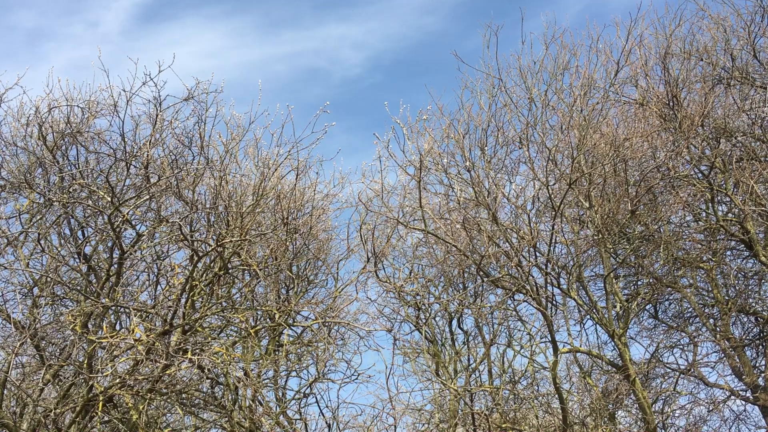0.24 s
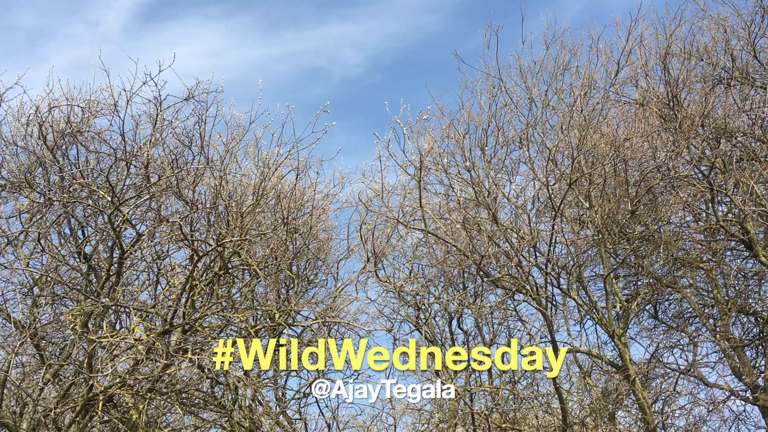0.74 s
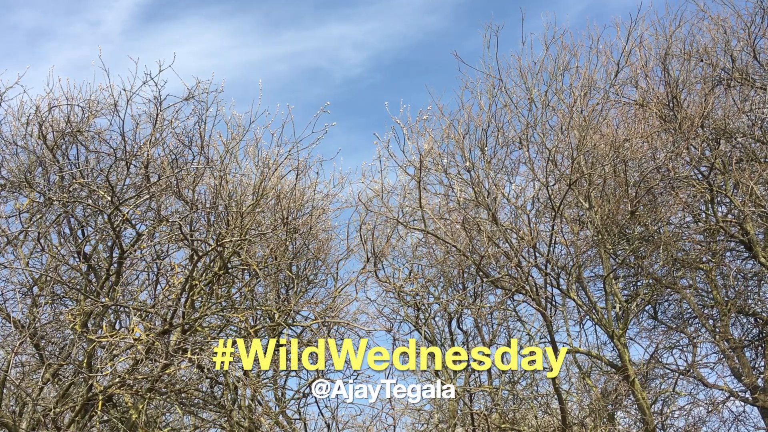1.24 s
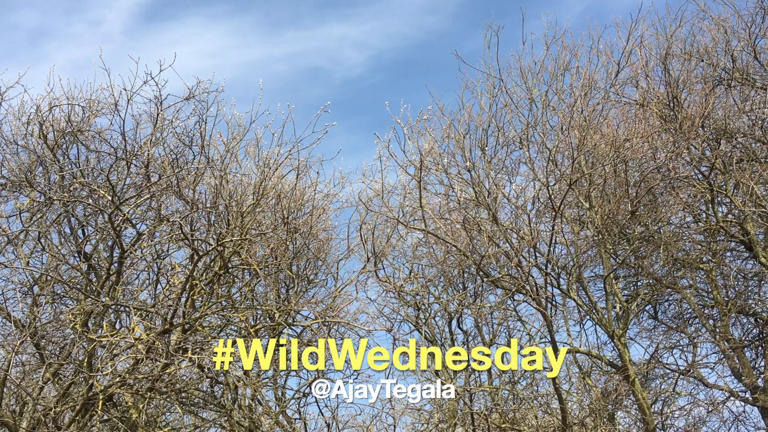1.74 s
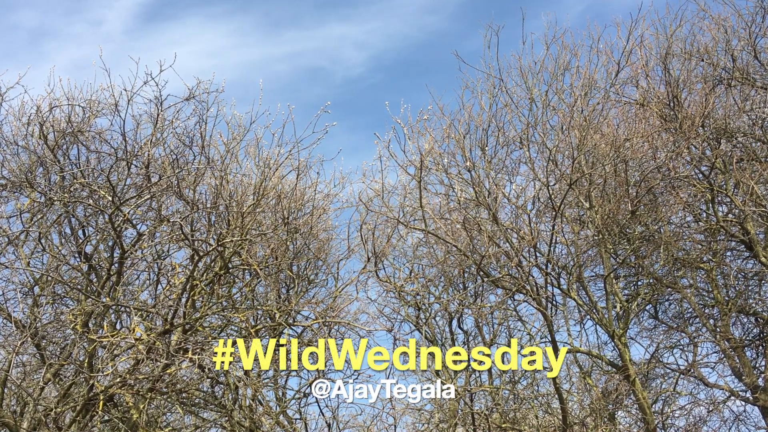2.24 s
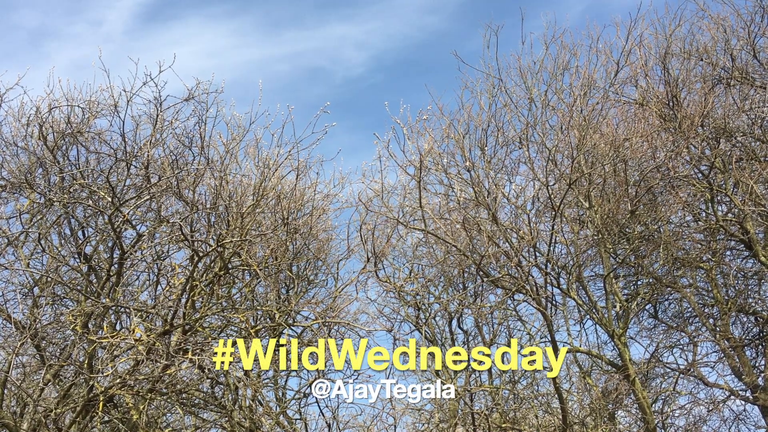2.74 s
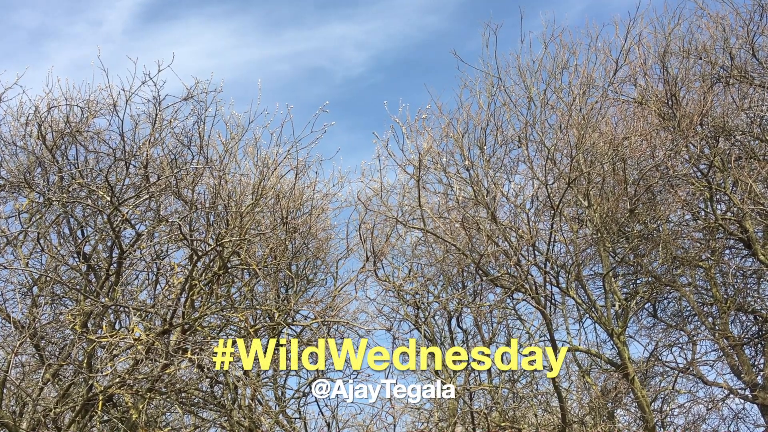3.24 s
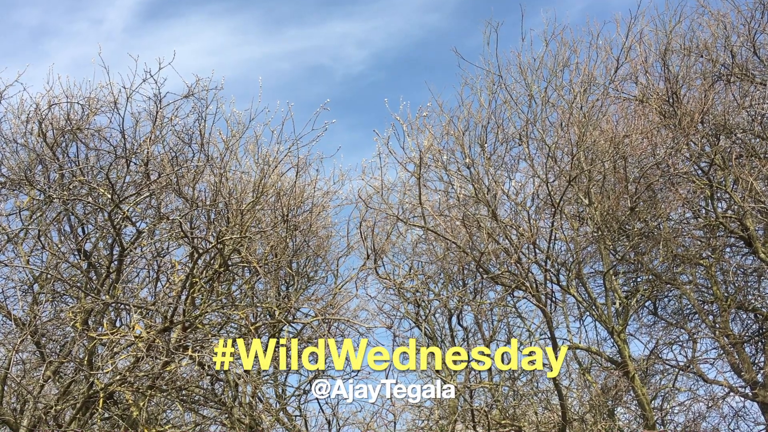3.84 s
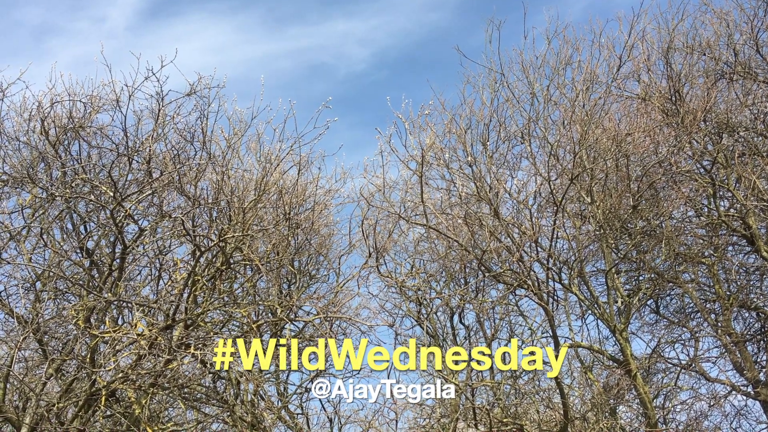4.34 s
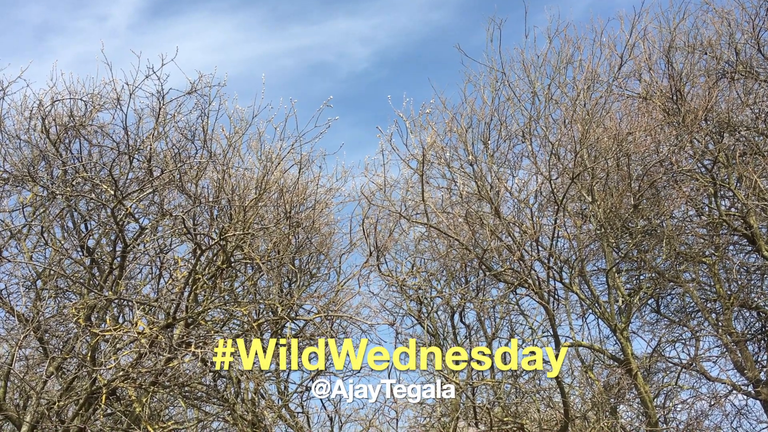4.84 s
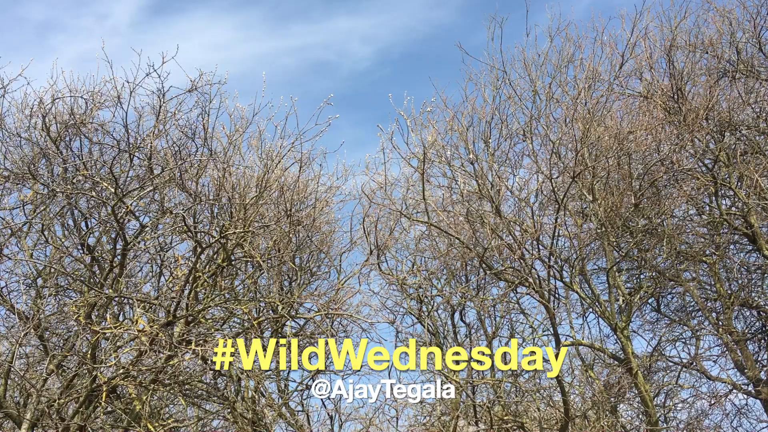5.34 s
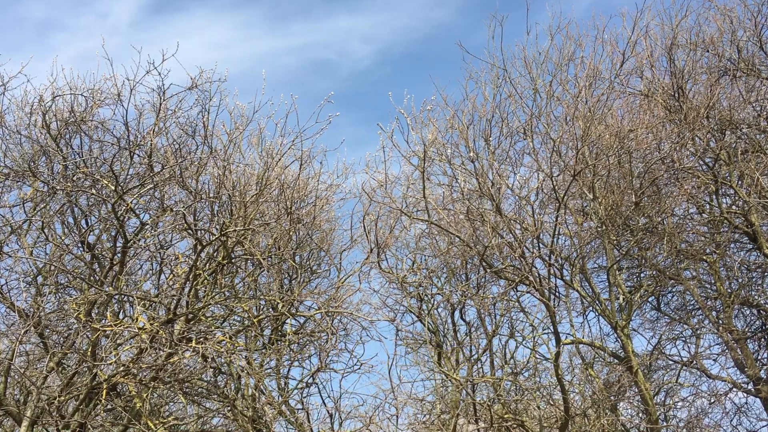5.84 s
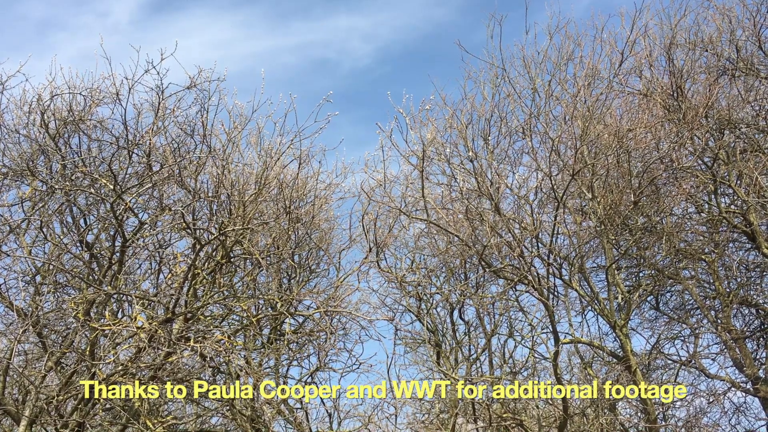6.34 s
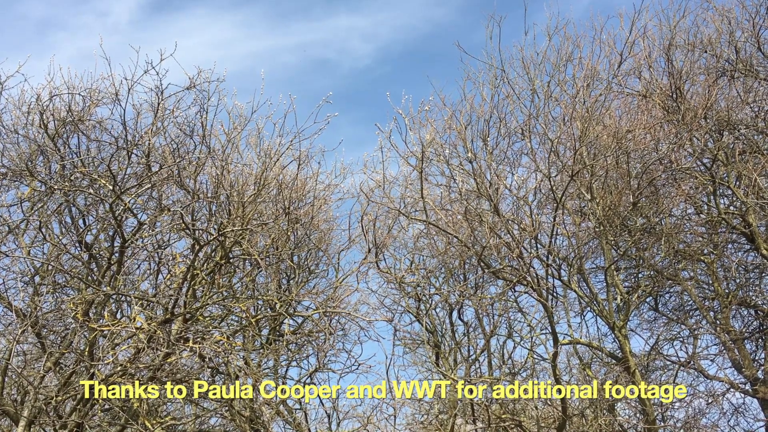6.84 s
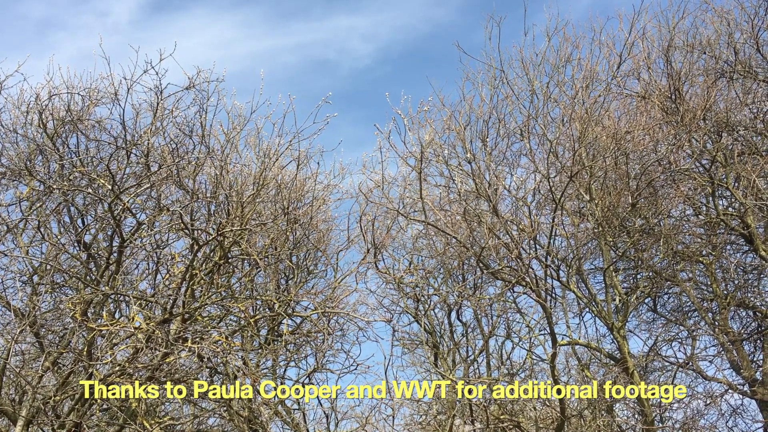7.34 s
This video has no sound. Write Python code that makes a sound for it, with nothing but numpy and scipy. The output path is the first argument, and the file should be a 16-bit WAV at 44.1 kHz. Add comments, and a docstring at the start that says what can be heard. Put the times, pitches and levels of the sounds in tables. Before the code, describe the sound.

In open woodland, small birds sing bright, quick phrases close by while others whistle thinly farther off. Twice, a few seconds apart, a woodpecker hammers out a rapid, hollow roll that rings among the trees and fades. Between the rolls comes a faint, hoarse call from a large bird. A soft low rumble continues throughout, with a few gentle puffs of wind on the microphone late on.

```python
"""Bare woodland: a woodpecker drums two quickening rolls on a hollow limb; songbirds sing near and far.
Each bill strike is a click plus the limb's ringing modes; each songbird note is a gliding, near-pure tone.
A large bird calls once in the distance, twigs tick, and branches and trunks scatter the calls and strikes.
Under it lie a low far rumble and the hush of the air, and a breeze bumps the microphone."""
import sys
import numpy as np
from scipy import signal
from scipy.fft import rfft, irfft, next_fast_len
from scipy.io import wavfile
from scipy.ndimage import map_coordinates

SR = 44100
rng = np.random.default_rng(int(sys.argv[2]) if len(sys.argv) > 2 else 0)


def dump_mix(stems):
    """Bounce the given channels to the path in sys.argv[1] as a 16-bit WAV at rate SR."""
    frames = np.atleast_2d(stems).T  # one column per channel
    limited = np.clip(frames, -1, 1)  # hard clip at full scale
    pcm = np.round(limited * 32767).astype(np.int16)
    wavfile.write(sys.argv[1], SR, pcm)


N = 334719
CLOSE_OVERTONE_DB = -43


def woodpecker():
    """Each strike is a click that sweeps down; the limb rings on and its hollow note fills the wood."""
    # Limb modes. Each row: frequency in Hz, relative level in dB, t60 in seconds.
    limb_modes = [(684, -9.5, 0.035), (980, -30, .025), (1115, -0.5, 0.024), (1239, -4.5, 0.064),
                  (1296, 0.5, 0.029), (1840, -18, 0.011), (2180, -21, 0.014)]
    # The trunk's response to the click. Each row: frequency in Hz, gain in dB.
    click_colour = [(500, -7), (750, 2.5), (1200, 1), (1550, -10), (1900, 0.5), (2200, -2), (2350, -6),
                    (2650, -7.5), (3500, 3.5)]
    clicks, rings = np.zeros(N), np.zeros(N)
    t = np.arange(SR // 8) / SR
    phase, envelope = glide(0.0034, [3300, 1750, 600], waver=0, waver_hz=100, taper=0.73)
    click = envelope * np.sin(phase)
    for start_s, db in strikes():
        ring = np.zeros(len(t))
        for hz, mode_db, t60_s in limb_modes:
            decay = amp(mode_db + rng.normal(0, 1) - 60 * t / t60_s)
            ring += decay * np.sin(2 * np.pi * (hz * t + rng.random()))
        ring *= 1 - np.exp(-t / 0.0015)
        heard_click = woods(click, early_db=-6, early_t60_s=0.1, late_db=-8, build_s=0.023)
        heard_ring = woods(ring, early_db=3.5, early_t60_s=0.086, late_db=1, build_s=0.12)
        add(clicks, start_s, amp(db + 7.5) * heard_click)
        add(rings, start_s + 0.002043, amp(db + 2) * heard_ring)
    return filtered(clicks, lambda hz: amp(along(click_colour, hz))) + rings


def strikes():
    """Time and level of each bill strike: a roll starts softly, hesitates, quickens and tires."""
    # Drum rolls. Each row: start in seconds, strike count, relative level in dB.
    rolls = [(2.6539, 17, -49), (6.2576, 16, -49)]
    gap_s, quicken_s, hesitate_s = 0.0578, 0.00135, 0.0065
    first_tap_db, tiring_db = -8, -8.5
    for start_s, count, db in rolls:
        k = np.arange(count)
        gaps_s = gap_s - quicken_s * k + hesitate_s * 0.3 ** k
        levels_db = db + first_tap_db * (k == 0) + tiring_db * (k / k[-1]) ** 3.2
        yield from zip(start_s + np.cumsum(gaps_s) - gaps_s, levels_db)


def near_birds():
    """Loud pure slurs from the closest trees: one song sung twice, and a lower see-saw figure."""
    # The song. Each row: offset and length in seconds, pitch in Hz, relative level in dB, syllable.
    song = [(0, .042, 4460, -47, "curl"), (0.073, 0.014, 4310, -49, "lift"),
            (0.106, .015, 4226, -48.5, "level"), (0.115, .028, 3980, -46, "dip"),
            (0.133, .024, 5087, -52, "arch"), (0.182, .012, 4560, -47, "level"),
            (.224, 0.018, 4250, -50.5, "level"), (0.264, 0.019, 4595, -50, "sag"),
            (0.299, 0.029, 4150, -53, "sag"), (0.343, 0.026, 4627, -50, "sag"),
            (0.444, .021, 4424, -45, "dip"), (0.568, 0.024, 5030, -50, "rise"),
            (0.663, 0.018, 4140, -48.5, "rise"), (0.962, .082, 6000, -46.5, "swoop"),
            (1.075, .024, 4600, -54.5, "flick"), (1.096, 0.059, 5600, -52, "sag"),
            (1.179, .024, 4770, -55, "flick"), (1.214, .028, 4940, -54.5, "fall"),
            (1.266, 0.031, 4530, -61.5, "flick"), (1.398, .019, 4600, -59, "flick"),
            (1.42, .019, 5710, -54, "fall")]
    # Its entries. Each row: start in seconds, gain in dB.
    song_starts = [(0.586, 0), (4.19, 0)]
    # See-saw figure. Each row: offset and length in seconds before stretch, semitones, accent in dB, syllable.
    seesaw = [(0, .033, 0, 0.5, "rise"), (.055, .023, 0.97, -2.5, "dive")]
    # Its entries. Each row: start in seconds, time stretch, pitch in Hz, relative level in dB.
    seesaw_calls = [(1.689, 0.88, 3750, -52), (1.814, 1.05, 3740, -52), (1.937, 1.25, 3660, -54.5),
                    (2.092, .85, 3210, -62)]
    songs = [(start_s + offset_s, length_s, hz, db + gain_db, shape)
             for start_s, gain_db in song_starts for offset_s, length_s, hz, db, shape in song]
    return sing(songs + repeats(seesaw, seesaw_calls), gain_db=2,
                voice=dict(overtone_db=CLOSE_OVERTONE_DB, waver=0.0099, taper=0.22, rasp_db=-31.5),
                echo=dict(early_db=-2, early_t60_s=0.18, late_db=-8.5, build_s=0.02))


def clear_close_notes():
    """Clear notes so close that they leave little echo, among them the closing notes of each pass of the near
    song."""
    # Each row: start and length in seconds, pitch in Hz, relative level in dB, syllable.
    clear_notes = [(1.183, 0.035, 3550, -45, "crest"), (1.219, .037, 3500, -51, "sag"),
                   (1.559, 0.048, 3930, -50.5, "hook"), (1.782, 0.028, 6030, -55.5, "lift"),
                   (4.773, 0.0323, 3386, -40, "lift"), (4.798, 0.041, 3460, -43.5, "level"),
                   (4.831, 0.11, 3432, -48, "level")]
    return sing(clear_notes, gain_db=3,
                voice=dict(overtone_db=CLOSE_OVERTONE_DB, waver=0.008, taper=0.22, rasp_db=-33),
                echo=dict(early_db=-3.5, early_t60_s=0.17, late_db=-15.5, build_s=0.02))


def shrill_bird():
    """A close, shrill voice with a faint octave: sweeps, then held notes and drops in turn."""
    # Each row: start and length in seconds, pitch in Hz, relative level in dB, syllable.
    phrase = [(5.063, 0.078, 9100, -61.5, "peak"), (5.075, .04, 7750, -57.5, "crest"),
              (5.175, .038, 8740, -62, "crest"), (5.184, 0.026, 7450, -51, "crest"),
              (5.243, .075, 5900, -45.5, "plunge"), (5.366, 0.05, 6950, -47.5, "level"),
              (5.461, 0.066, 6270, -44.5, "drop"), (5.562, 0.074, 7070, -47.5, "level"),
              (5.701, 0.063, 6550, -45.5, "drop"), (5.805, 0.11, 7260, -52, "level")]
    return sing(phrase, gain_db=2,
                voice=dict(overtone_db=-30.5, waver=0.0066, taper=0.2, rasp_db=-43),
                echo=dict(early_db=-4, early_t60_s=0.17, late_db=-9.5, build_s=0.029))


def warbler():
    """A close, hoarse voice with side tones and a fluttering pitch."""
    # Each row: start and length in seconds, pitch in Hz, relative level in dB, syllable.
    warble_notes = [(5.995, 0.02, 4120, -55, "arch"), (5.999, 0.056, 3374, -44, "arch"),
                    (6.054, 0.013, 3780, -51.5, "fall"), (6.084, 0.01, 3460, -46, "hook"),
                    (6.111, 0.015, 3650, -44, "hook"), (6.141, 0.015, 3394, -45, "hook"),
                    (6.142, 0.04, 2430, -61.5, "dip"), (6.296, 0.049, 2776, -54, "lift"),
                    (6.363, 0.06, 2700, -58, "sag"), (6.447, .08, 2673, -63, "level"),
                    (6.641, 0.015, 3860, -45, "dive"), (6.667, 0.021, 2725, -54, "fall"),
                    (6.724, 0.0081, 2540, -49, "hook"), (6.784, .018, 4700, -44.5, "dip"),
                    (6.797, 0.018, 5230, -49.5, "rise"), (6.817, 0.044, 4590, -45, "fall"),
                    (6.885, .018, 4280, -46, "flick"), (6.89, 0.019, 5470, -53, "level"),
                    (7.004, 0.0215, 3280, -43.5, "fall"), (7.088, 0.12, 3143, -47, "swing"),
                    (7.263, 0.021, 4130, -47, "dive"), (7.269, 0.018, 4000, -51, "level"),
                    (7.331, 0.018, 2440, -55, "dive"), (7.365, 0.04, 2287, -55.5, "rise"),
                    (7.454, 0.012, 3920, -42, "arch"), (7.466, 0.0207, 4600, -46.5, "rise"),
                    (7.525, 0.016, 4230, -51, "sag"), (7.526, 0.021, 5630, -50, "dip")]
    return sing(warble_notes, gain_db=3,
                voice=dict(overtone_db=CLOSE_OVERTONE_DB, waver=0.0277, taper=0.21, rasp_db=-16),
                echo=dict(early_db=-1, early_t60_s=0.1, late_db=-13.5, build_s=0.02))


def high_birds():
    """Long thin whistles from the treetops."""
    # Each row: start and length in seconds, pitch in Hz, relative level in dB, syllable.
    thin_notes = [(0.268, 0.14, 6460, -59, "sag"), (0.44, 0.093, 8430, -52, "level"),
                  (2.73, .14, 7540, -72, "level"), (3.393, 0.13, 8490, -63, "sag"),
                  (3.562, 0.07, 8330, -61, "sag"), (3.697, 0.028, 8480, -54, "level"),
                  (3.786, 0.034, 8550, -51, "level"), (3.834, 0.14, 7910, -56.5, "sag"),
                  (3.842, 0.16, 8460, -50.5, "level"), (4.012, 0.12, 8450, -51, "level"),
                  (4.248, .099, 6700, -71.5, "level"), (7.283, 0.16, 7530, -65.5, "sag")]
    return sing(thin_notes, gain_db=-2.5,
                voice=dict(overtone_db=-56, waver=0.0059, taper=0.1, rasp_db=-55),
                echo=dict(early_db=-3, early_t60_s=0.18, late_db=-8, build_s=0.062))


def trills():
    """A pitch shaken very fast spreads each note into a thin buzz."""
    # Each row: start and length in seconds, first, middle and last pitch in Hz, relative level in dB.
    buzzes = [(0.562, .12, 7440, 7000, 6800, -72), (1.817, 0.22, 7700, 6950, 6940, -68),
              (2.853, .23, 7030, 6790, 6550, -71.5), (4.382, 0.094, 7100, 6930, 6930, -74)]
    out = np.zeros(N)
    for start_s, length_s, *pitches_hz, db in buzzes:
        note = whistle(length_s, pitches_hz, overtone_db=-46, waver=0.028, taper=0.34, rasp_db=-37)
        heard = woods(note, early_db=-8.5, early_t60_s=0.14, late_db=-3, build_s=0.03)
        add(out, start_s, amp(db) * heard)
    return out


def far_birds():
    """Distant repeated calls and stray notes, each trailing a soft echo."""
    # Runs of one falling slur. Each row: start in seconds, relative level in dB.
    slur_runs = [(0.613, -66), (2.24, -73)]
    # Slurs in each run.
    slur_counts = [5, 3]
    # Calls that fall, hold and fall. Each row: start in seconds, held pitch in Hz, relative level in dB.
    stair_calls = [(2.671, 4630, -64), (2.883, 4030, -64.5), (3.042, 4570, -62.5), (5.809, 4070, -65),
                   (6.157, 4660, -63), (6.277, 4610, -64), (6.648, 4530, -66)]
    # Two-note figure. Each row: offset and length in seconds before stretch, semitones,
    # accent in dB, syllable.
    two_note = [(0, .042, 8, -2, "fall"), (.058, 0.0585, 0, 0.5, "dip")]
    # Its entries. Each row: start in seconds, time stretch, pitch in Hz, relative level in dB.
    two_note_calls = [(2.275, 0.97, 3570, -65), (2.508, 0.95, 3725, -69.5), (5.883, 0.96, 3590, -64.5),
                      (6.521, 0.98, 3600, -63.5)]
    # Stray notes. Each row: start and length in seconds, pitch in Hz, relative level in dB, syllable.
    strays = [(0.048, 0.25, 3646, -74, "level"), (0.139, 0.026, 4620, -67.5, "rise"),
              (0.213, 0.039, 4410, -64.5, "lift"), (0.222, 0.034, 2170, -67, "hook"),
              (0.33, 0.02, 5000, -71, "dive"), (0.45, .035, 5150, -74, "rise"),
              (0.465, .057, 4730, -64, "level"), (0.527, .045, 3150, -77, "fall"),
              (0.54, 0.021, 7100, -69, "rise"), (0.671, .064, 7750, -65.5, "sag"),
              (0.808, .061, 7960, -67, "sag"), (1.248, 0.055, 7720, -73, "sag"),
              (1.422, .026, 2150, -70, "fall"), (1.44, .027, 5750, -64, "lift"),
              (2.25, 0.037, 2430, -70, "dive"), (4.109, 0.075, 3350, -73, "dive"),
              (5.862, 0.029, 1646, -68.5, "dive"), (6.266, 0.033, 2140, -59, "dip"),
              (6.911, .052, 6320, -68, "rise"), (6.98, .15, 8250, -78.5, "sag"),
              (7.088, 0.18, 4440, -64.5, "arch"), (7.188, 0.094, 5500, -64.5, "rise"),
              (7.445, 0.092, 5710, -61.5, "dip")]
    slur_s, slur_period_s, slur_hz, stair_s = 0.066, 0.175, 5880, 0.09
    slurs = [(start_s + k * slur_period_s, slur_s, slur_hz, db, "fall")
             for (start_s, db), count in zip(slur_runs, slur_counts) for k in range(count)]
    stairs = [(start_s, stair_s, hz, db, "stair") for start_s, hz, db in stair_calls]
    return sing(slurs + stairs + repeats(two_note, two_note_calls) + strays, gain_db=1.5,
                voice=dict(overtone_db=-41, waver=0.0073, taper=0.2, rasp_db=-52),
                echo=dict(early_db=-6, early_t60_s=0.36, late_db=-21.5, build_s=0.024))


def large_bird():
    """A hoarse harmonic call from far away, wrapped in echo."""
    # Each row: start and length in seconds, first, middle and last pitch in Hz, relative level in dB.
    honks = [(3.525, 0.045, 575, 673, 650, -54), (3.592, 0.033, 970, 1040, 935, -56),
             (3.607, 0.147, 698, 722, 714, -53)]
    # Throat response. Each row: frequency in Hz, gain in dB.
    throat = [(700, -6), (1050, 5), (1450, -8), (2150, -0.5), (2900, -25), (3600, -0.5), (4300, -10.5),
              (5200, -19), (7000, -25)]
    out = np.zeros(N)
    for start_s, length_s, *pitches_hz, db in honks:
        phase, envelope = glide(length_s, pitches_hz, waver=0.0144, waver_hz=293, taper=0.2)
        call = envelope * sum(amp(along(throat, k * pitches_hz[1])) * np.sin(k * phase)
                              for k in range(1, 10))
        call *= 1 + 0.43 * wobble(1200, len(call))  # uneven cycles make it hoarse
        heard = woods(call, early_db=-4.5, early_t60_s=0.4, late_db=-2.5, build_s=0.02)
        add(out, start_s, amp(db - 5.5) * heard)
    return out


def chorus(count=260, centre_hz=4907):
    """Many faint slurs from all through the wood, blurred together by their echoes."""
    # Chorus swell. Each row: time in seconds, relative level in dB.
    levels = [(0, -87), (.5, -75), (.65, -62.5), (1.1, -55), (2, -56.5), (3.4, -75.5), (4.3, -81),
              (4.9, -69), (5.4, -58.5), (5.9, -76), (6.5, -78), (6.9, -62), (7.59, -78)]
    out = np.zeros(N)
    for start_s in (np.arange(count) + rng.random(count)) * N / SR / count - 0.1:
        pitches_hz = centre_hz * np.exp(rng.uniform(-0.3, 0.3) + rng.normal(0, 0.07, size=3))
        length_s = rng.uniform(0.0242, 0.07)
        note = whistle(length_s, pitches_hz, overtone_db=-27, waver=0.0099, taper=0.93, rasp_db=-37)
        add(out, start_s, note)
    blurred = woods(out, early_db=4.5, early_t60_s=0.055, late_db=8, build_s=0.018)[:N]
    level_db = np.interp(np.arange(N) / SR, *np.transpose(levels)) - 5
    return amp(level_db) * unit(blurred)


def twigs(t60_s=0.009):
    """Tiny dry cracks in the branches."""
    # Each row: start in seconds, level in dB.
    cracks = [(4.255, -63), (4.437, -50)]
    out = np.zeros(N)
    t = np.arange(SR // 50) / SR
    for start_s, db in cracks:
        add(out, start_s, amp(db - 60 * t / t60_s) * rng.standard_normal(len(t)))
    return out


def background():
    """Far rumble that swells and sinks, the hush of the air, and soft puffs on the microphone."""
    # Rumble swell. Each row: time in seconds, relative level in dB.
    rumble_levels = [(0, -55.5), (.22, -49.5), (.35, -63), (.6, -50.5), (.95, -56), (1.3, -58.5),
                     (2.1, -56.5), (2.9, -59), (3.9, -61), (4.55, -56.5), (5.1, -56.5), (5.7, -56.5),
                     (6.3, -58), (7.59, -56.5)]
    # Breeze puffs. Each row: centre and width in seconds, level in dB.
    puffs = [(6.349, 0.016, -41), (6.75, 0.043, -50.5), (6.84, 0.034, -47), (7.08, 0.12, -54)]
    # Noise spectra. Each row: frequency in Hz, relative density in dB.
    rumble_colour = [(15, -47), (28, -31), (40, 0), (52, 4), (80, -4), (120, -12), (200, -29), (500, -64)]
    air_colour = [(60, 2.5), (200, 0), (400, 1), (750, -5.5), (1100, -5.5), (1600, -13.5), (2600, -16.5),
                  (4200, -15.5), (7000, -23.5), (10500, -26.5), (14000, -26.5), (15700, -31)]
    puff_colour = [(20, -12), (50, 7), (130, -2.5), (210, -8.5), (300, -41), (900, -53)]
    t = np.arange(N) / SR
    rumble_db = np.interp(t, *np.transpose(rumble_levels)) - 1 + 1.5 * wobble(7, N)
    rumble = amp(rumble_db) * noise(rumble_colour)
    air = amp(-64 + 0.13 * wobble(3.02, N)) * noise(air_colour)
    breeze = sum(amp(db) * np.exp(-0.5 * ((t - at_s) / width_s) ** 2) for at_s, width_s, db in puffs)
    return rumble + air + breeze * noise(puff_colour)


def sing(notes, gain_db, voice, echo):
    """A track of notes whistled in one voice and scattered by the wood."""
    out = np.zeros(N)
    for start_s, length_s, hz, db, shape in notes:
        note = whistle(length_s, syllable(shape, hz), **voice)
        add(out, start_s, amp(db + gain_db) * woods(note, **echo))
    return out


def repeats(figure, calls):
    """The notes of a short figure at each call's time, pace, pitch and level."""
    return [(start_s + stretch * offset_s, stretch * length_s, hz * 2 ** (step / 12), db + accent, shape)
            for start_s, stretch, hz, db in calls for offset_s, length_s, step, accent, shape in figure]


def syllable(shape, hz):
    """Pitches in Hz of a named syllable sung at hz."""
    # Pitch contours. Each entry: name, semitones about the pitch at even steps through the note.
    contours = {"level": [-0.081, .05, -0.022], "sag": [.6, 0, -0.31], "dip": [.8, 0, 0.34], "arch": [-1.33,
                0, -.9], "lift": [-0.8, 0, 0.52], "rise": [-1.58, 0, 1.65], "flick": [-3.5, 0, 3.7], "hook":
                [-0.58, 0, -2.8], "fall": [1.93, 0, -1.87], "dive": [4.21, 0, -3.5], "curl": [-2, 0, -0.2,
                -2.6, 0], "crest": [-1.63, 0, 0], "peak": [-5, 0, -7], "swoop": [-7, 2, 1.6, 0.2, -0.06,
                -1.2, -3], "drop": [0.54, 1.7, 0.5, 0, 0.047], "plunge": [0, 4, 4, 1.5, 0.9, -0.2, 0, 0.5,
                1], "swing": [-1.1, -0.284, 0.29, .3, -0.65, -0.17, 2.5], "stair": [7.5, 3, 0.5, -0.8, 0,
                .5, -0.06, -.9, -10.5]}
    return hz * 2 ** (np.array(contours[shape]) / 12)


def whistle(length_s, pitches_hz, overtone_db, waver, taper, rasp_db):
    """A near-pure tone with a faint octave; the syrinx's second side adds unsteady side tones."""
    phase, envelope = glide(length_s, pitches_hz, waver, waver_hz=257, taper=taper)
    second_side = np.sin(rng.uniform(0.1, 0.3) * phase + 1.6 * wobble(700, len(phase)))
    second_side += 0.18 * wobble(5000, len(phase))
    tone = np.sin(phase) + amp(overtone_db) * np.sin(2 * phase)
    return envelope * (1 + amp(rasp_db) * second_side) * tone


def glide(length_s, pitches_hz, waver, waver_hz, taper):
    """Phase and envelope of a note bending along evenly spaced pitches; waver is a fraction of pitch."""
    progress = np.linspace(0, 1, int(max(length_s, 0.005) * SR))
    bend = np.polyfit(np.linspace(0, 1, len(pitches_hz)), pitches_hz, min(len(pitches_hz) - 1, 6))
    hz = np.polyval(bend, progress) * (1 + waver * wobble(waver_hz, len(progress)))
    return 2 * np.pi * np.cumsum(hz) / SR, signal.windows.tukey(len(progress), taper)


def woods(x, early_db, early_t60_s, late_db, build_s):
    """Direct sound, quick echoes off nearby branches, and a tail that builds up among the trunks."""
    # Tail decay. Each row: frequency in Hz, t60 in seconds.
    tail_t60 = [(500, 0.74), (1300, 0.97), (3500, 1), (6000, 0.58), (9000, 0.43), (15000, 0.54)]
    hz, age_s, spectra = signal.stft(rng.standard_normal(SR), SR, nperseg=256)
    decay = amp(-60 * age_s / along(tail_t60, hz)[:, None])
    tail = signal.istft(spectra * decay, SR, nperseg=256)[1]
    t = np.arange(len(tail)) / SR
    tail *= 1 - np.exp(-t / build_s)
    early = rng.standard_normal(len(t)) * amp(-60 * t / early_t60_s) * (1 - np.exp(-t / 0.0013))
    paths = amp(early_db) * early / np.linalg.norm(early) + amp(late_db) * tail / np.linalg.norm(tail)
    paths[0] += 1  # direct path
    return signal.fftconvolve(x, paths)


def amp(db):
    """Decibels to gain."""
    return 10 ** (np.asarray(db) / 20)


def unit(x):
    """Scale to rms 1."""
    return x / np.sqrt(np.mean(x ** 2) + 1e-20)


def along(points, hz):
    """Interpolate (Hz, value) points on a log axis."""
    knots_hz, values = np.transpose(points)
    return np.interp(np.log(hz + 1), np.log(knots_hz), values)


def wobble(rate_hz, size):
    """A smooth random curve with rate_hz knots a second."""
    knots = rng.standard_normal(int(size * rate_hz / SR + 4))
    return map_coordinates(knots, [np.arange(size) * rate_hz / SR])


def filtered(x, response):
    """Apply a gain given as a function of Hz."""
    size = next_fast_len(N + SR // 2)
    return irfft(rfft(x, size) * response(np.fft.rfftfreq(size, 1 / SR)), size)[:N]


def noise(spectrum):
    """Coloured noise of rms 1."""
    return unit(filtered(rng.standard_normal(N), lambda hz: amp(along(spectrum, hz))))


def add(track, start_s, sound):
    """Mix a sound into the track."""
    part = track[max(round(start_s * SR), 0):][:len(sound)]
    part += sound[:len(part)]


def scene():
    """All the birds over the background, in mono."""
    close = near_birds() + clear_close_notes() + shrill_bird() + warbler()
    distant = high_birds() + trills() + far_birds() + chorus() + large_bird()
    return (woodpecker() + close + distant + twigs() + background())[None]


def record(dry):
    """The recorder keeps nothing above its band limit."""
    top_hz = 15680
    return filtered(dry[0], lambda hz: hz < top_hz)[None]


dry = scene()
out = record(dry)
dump_mix(out)
```